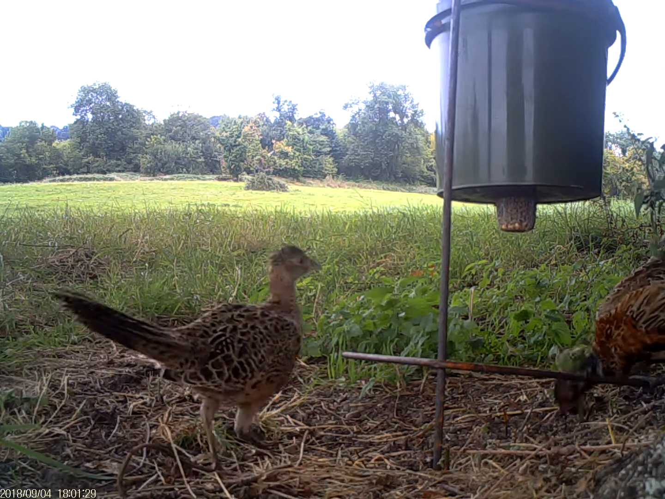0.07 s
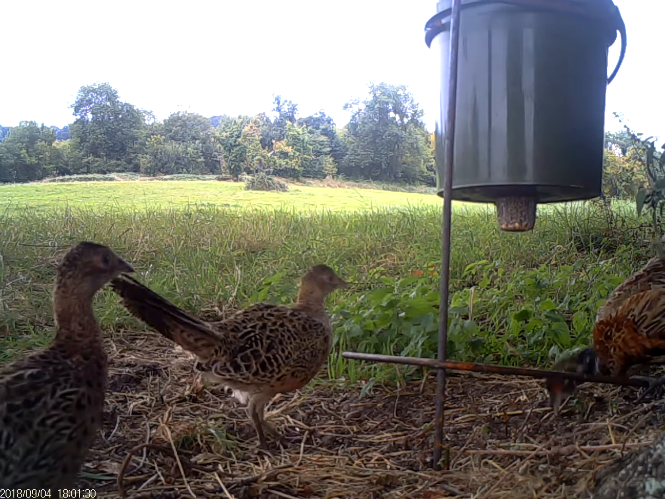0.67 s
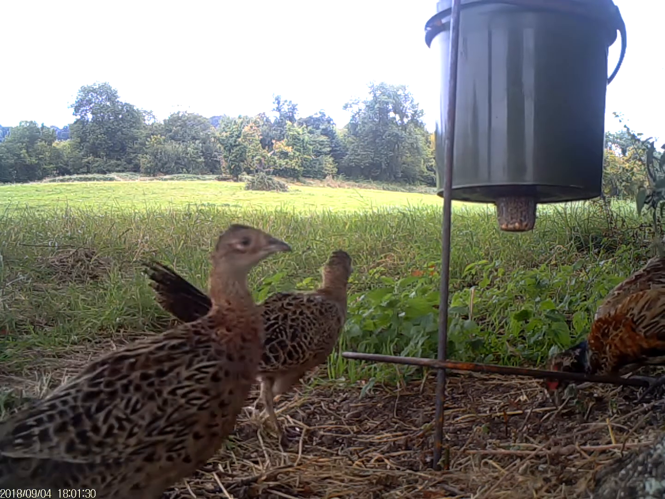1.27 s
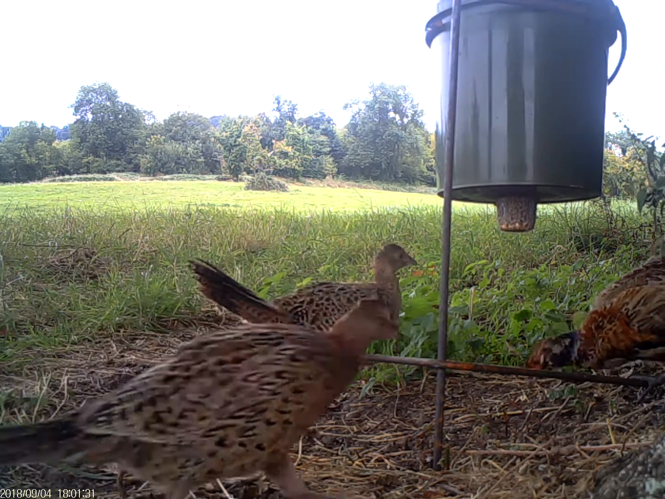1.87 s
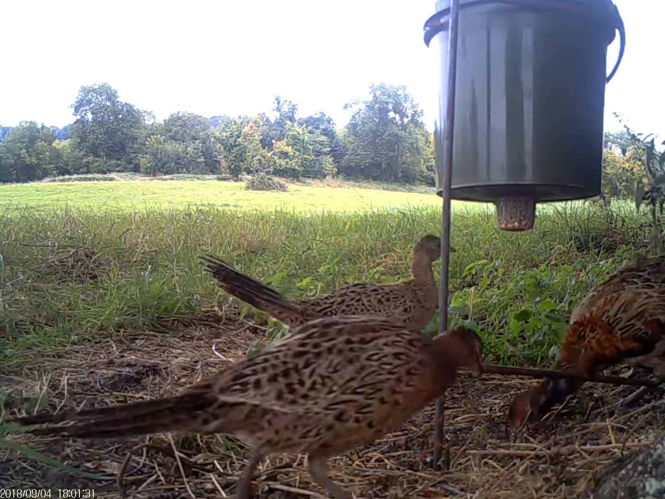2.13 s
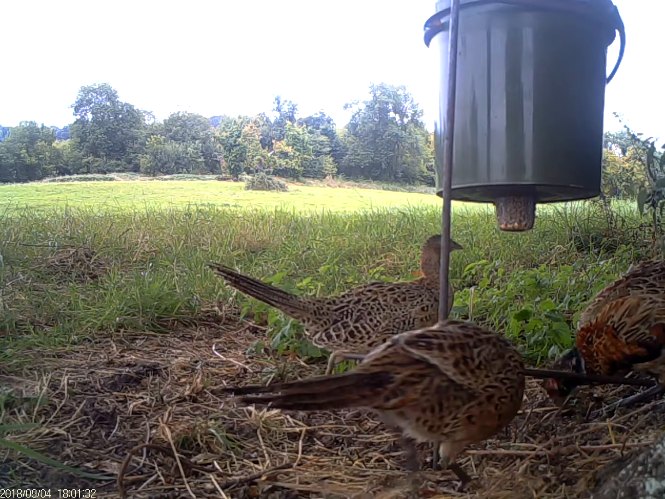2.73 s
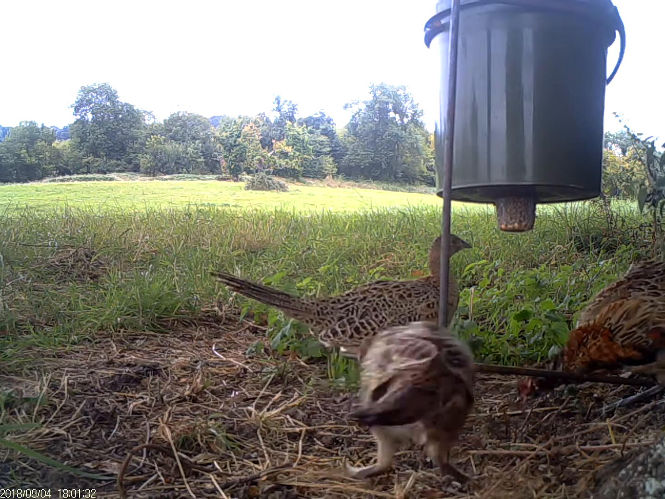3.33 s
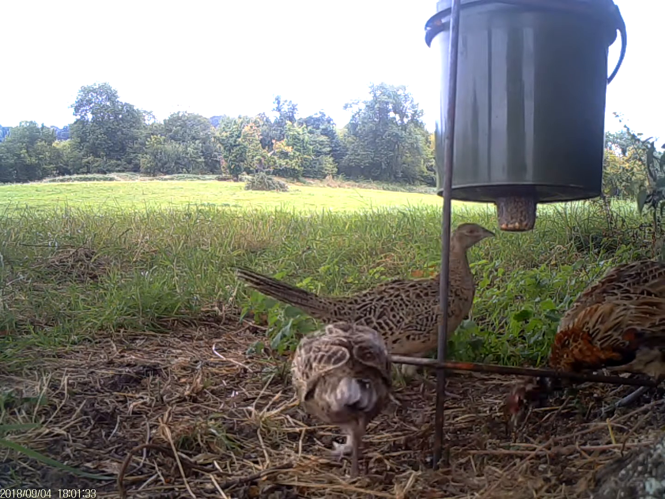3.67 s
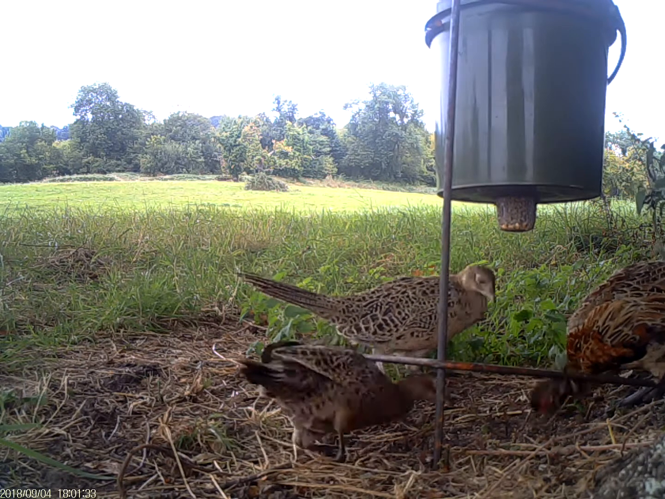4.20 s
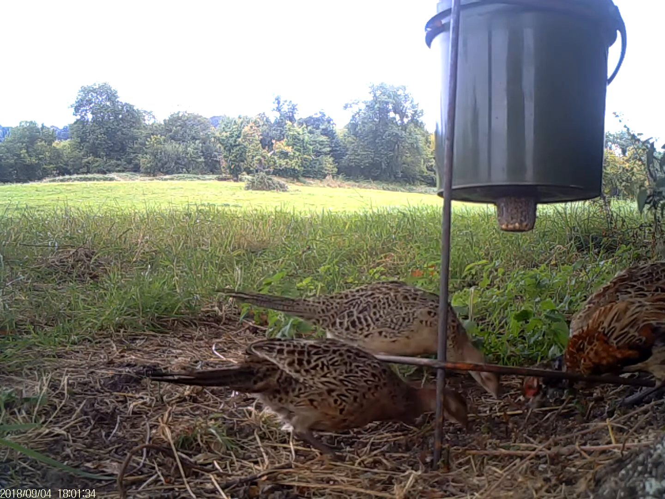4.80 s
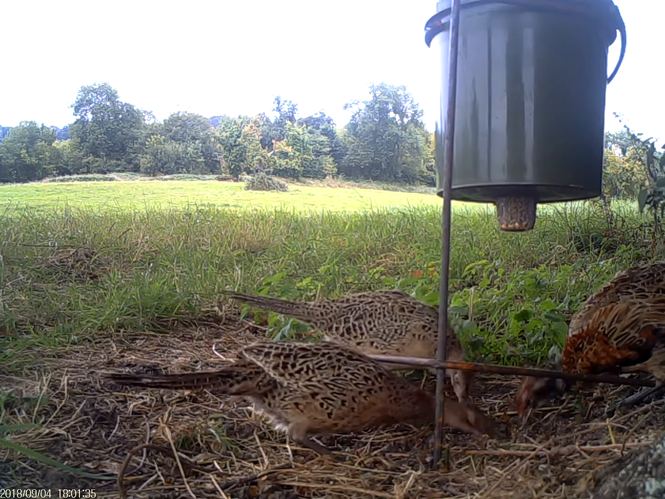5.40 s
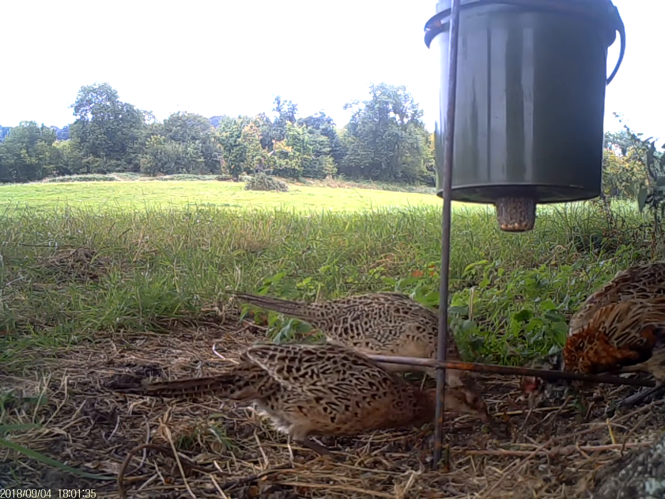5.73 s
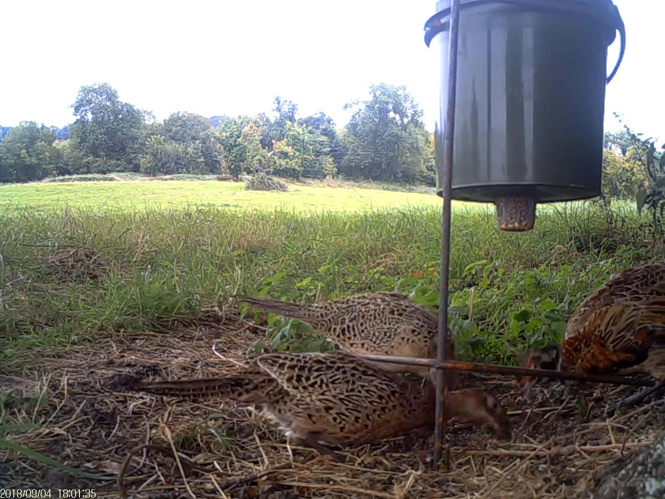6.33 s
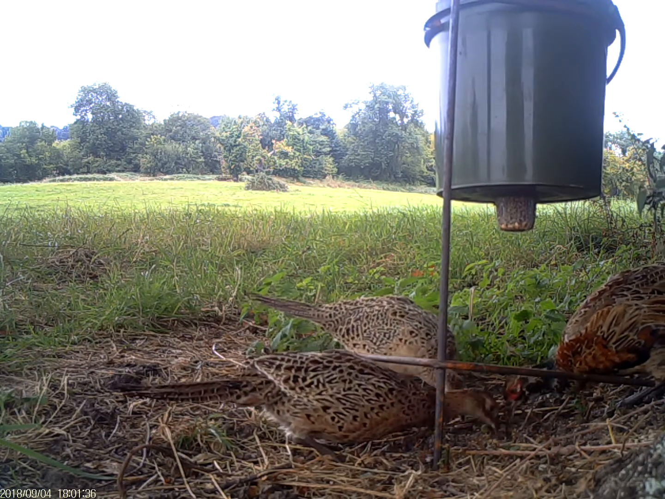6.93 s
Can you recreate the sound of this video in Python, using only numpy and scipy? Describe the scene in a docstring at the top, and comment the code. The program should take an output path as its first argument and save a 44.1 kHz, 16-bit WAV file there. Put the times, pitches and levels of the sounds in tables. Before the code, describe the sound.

A pheasant brushes through dry straw right by the microphone, a brief, crisp rustle with a few sharp, high snaps. Lighter steps and pecks follow as faint, scattered crackles and ticks, thinning out as the birds settle to feed. Light wind rumbles on the microphone in small gusts over the soft, steady hiss of an open field.

```python
"""Beside a field feeder, on dry straw, with a small trail camera close to the pheasants.
One bird brushes through the stalks right by the microphone. Lighter steps and pecks follow,
crackling as dry fibres slip and break, and single stalks snap with a short, high ring.
Light wind rumbles on the microphone over a steady, soft hiss."""
import sys
import numpy as np
from scipy import signal
from scipy.fft import rfft, irfft, next_fast_len
from scipy.io import wavfile
from scipy.ndimage import map_coordinates

SR = 44100
rng = np.random.default_rng(int(sys.argv[2]) if len(sys.argv) > 2 else 0)


def dump_mix(stems):
    """Bounce the given channels to the path in sys.argv[1] as a 16-bit WAV at rate SR."""
    frames = np.atleast_2d(stems).T  # one column per channel
    limited = np.clip(frames, -1, 1)  # hard clip at full scale
    pcm = np.round(limited * 32767).astype(np.int16)
    wavfile.write(sys.argv[1], SR, pcm)


N = 311787


def amp(db):
    """Decibels to gain."""
    return 10 ** (np.asarray(db) / 20)


def unit(x):
    """Scale to rms 1."""
    return x / np.sqrt(np.mean(x ** 2) + 1e-20)


def wobble(rate):
    """A smooth random curve, rate knots a second."""
    knots = rng.standard_normal(int(N * rate / SR) + 4)
    return map_coordinates(knots, [np.arange(N) * rate / SR])


def filtered(x, response):
    """x through a gain that depends on frequency."""
    size = next_fast_len(N + SR // 2)
    return irfft(rfft(x, size) * response(np.fft.rfftfreq(size, 1 / SR)), size)[:N]


def coloured(x, colour):
    """x shaped by (Hz, dB) points on a log axis, at rms 1."""
    hz, db = np.transpose(colour)
    return unit(filtered(x, lambda f: amp(np.interp(np.log(f + 1), np.log(hz), db))))


def hiss():
    """The even hiss of the open field and the microphone."""
    # The tone of the hiss. Each row: frequency in Hz, relative level in dB.
    hiss_colour = [(20, 6), (150, 1), (300, -3), (600, -6), (1200, -9), (2500, -13.5), (5000, -18),
                   (8000, -19.5), (12000, -20.5), (14500, -19.5), (15700, -27)]
    return amp(-52.5) * coloured(rng.standard_normal(N), hiss_colour)


def swells(gusts):
    """Each gust rises and dies as a bell curve; their powers add."""
    t = np.arange(N) / SR
    bells = [amp(db) * np.exp(-((t - peak) / width) ** 2) for peak, width, db in gusts]
    return np.linalg.norm(bells, axis=0)


def wind(breeze_db=-44.5):
    """Slow eddies buffet the microphone all along; the strongest gust sheds smaller, higher ones."""
    # Gusts on the microphone. Each row: peak time in seconds, half-width in seconds, level in dB.
    gusts = [(.2, 0.099, -37), (1.5, 0.35, -41.5), (2.27, 0.21, -33), (2.74, 0.1, -35.5), (3.35, 0.32, -41),
             (4.95, 0.44, -37.5), (5.43, 0.076, -34.5), (6.2, 0.1, -40)]
    # The brief flurry of small eddies, with the same columns.
    flurry = [(2.35, .08, -41.5)]
    # The rumble of the slow eddies. Each row: frequency in Hz, relative level in dB.
    rumble_colour = [(5, -8.5), (14, 1.5), (28, -2.5), (45, -13.5), (80, -21), (130, -29.5), (250, -58),
                     (600, -69)]
    flurry_colour = [(25, -11), (60, 8.0), (95, -1), (150, -26), (400, -48)]
    slow_eddies = coloured(rng.standard_normal(N), rumble_colour)
    fast_eddies = coloured(rng.standard_normal(N), flurry_colour)
    return np.hypot(swells(gusts), amp(breeze_db)) * slow_eddies + swells(flurry) * fast_eddies


def ticks(times, gains, ring_hz, t60_s):
    """A sum of tiny damped rings, one for each stalk or fibre."""
    t = np.arange(SR // 200) / SR
    decay = np.exp(-np.log(1000) * t / t60_s)
    rings = gains[:, None] * np.sin(2 * np.pi * ring_hz[:, None] * t) * decay
    samples = np.round(times * SR).astype(int)[:, None] + np.arange(len(t))
    return np.bincount(samples.ravel(), rings.ravel(), N)[:N]


def pressure(strokes, rise_s, fall_s, ease_db_per_s=0):
    """Each stroke (start, length, dB) loads the straw, may ease as it packs, then lets it settle."""
    t = np.arange(N) / SR
    shapes = []
    for start, length, db in strokes:
        age = t - start
        held = amp(db - ease_db_per_s * np.clip(age, 0, length))
        edges = np.exp(np.minimum(age, 0) / rise_s - np.maximum(age - length, 0) / fall_s)
        shapes.append(held * edges)
    return np.max(shapes, axis=0)


def crackle(colour, fibres_per_s, spread_db, clump_db, rub):
    """Dry fibres slip and break in clumps, over the fine noise of stalks rubbing; rms 1."""
    when, size, pitch = rng.random((int(fibres_per_s * N / SR), 3)).T
    gains = amp(spread_db * size ** 2)  # a few large fibres among many small ones
    fibres = ticks(when * N / SR, gains, ring_hz=4000 + 11000 * pitch, t60_s=0.0014)
    rubbing = rub * rng.standard_normal(N)
    clumps = amp(clump_db * wobble(110))
    return coloured((unit(fibres) + rubbing) * clumps, colour)


def steps(rest_db=-68.5, settle_db_per_s=1.7):
    """Feet and beaks near the camera stir thick stalks and fine chaff, which never quite come to rest."""
    # Steps and pecks. Each row: start in seconds, length in seconds, level in dB, chaff share 0-1.
    footwork = [(0.327, 0.018, -46, 0.45), (.36, 0.036, -49, .38), (.505, .04, -58.5, .37),
                (.61, 0.018, -54.5, 0.4), (.85, 0.46, -62, .42), (1.44, .11, -65, .35),
                (1.85, .11, -60, .43), (2.35, .13, -66.5, .2), (2.744, .026, -53, 0.5),
                (3.302, 0.021, -54.5, .37), (3.357, 0.075, -63, 0.9), (3.674, 0.045, -56.5, 0.44),
                (3.868, .045, -59, .4), (4.22, .11, -60, .33), (5.67, 0.066, -64, .92),
                (6.737, .09, -66, .43)]
    # Thick stalks answer lower than chaff. Each row: frequency in Hz, relative level in dB.
    stalk_colour = [(3000, -31), (5000, -15.5), (6400, -13), (7400, 0), (8200, 2.5), (9400, -6),
                    (11000, -11), (15600, -35)]
    # The brighter tone of fine chaff, with the same columns.
    chaff_colour = [(6000, -19.5), (9000, -10), (10000, -5.5), (11100, -2.5), (12200, -5), (13400, -20),
                    (15600, -21)]
    start, length, db, chaff = np.transpose(footwork)
    # The litter between steps calms as the birds stop to feed.
    rest = amp(rest_db - settle_db_per_s * np.arange(N) / SR)
    litter = np.zeros(N)
    for share, colour in [(1 - chaff, stalk_colour), (chaff, chaff_colour)]:
        strokes = list(zip(start, length, db + 10 * np.log10(share)))
        tread = pressure(strokes, rise_s=0.002, fall_s=0.0061, ease_db_per_s=8)
        # The straw around the foot stirs before and after a step.
        shuffle = amp(-11) * pressure(strokes, rise_s=0.027, fall_s=0.15)
        load = np.sqrt(tread ** 2 + shuffle ** 2 + rest ** 2)
        litter += load * crackle(colour, fibres_per_s=1500, spread_db=12.0, clump_db=3, rub=0.75)
    shifting_weight = amp(0.83 * wobble(70))
    return litter * shifting_weight


def snaps(t60_s=0.0028):
    """A stalk gives way with a sharp ring and a fainter overtone; it is too thin to radiate low notes."""
    # Single stalks. Each row: time in seconds, relative level in dB, ring frequency in Hz.
    stalks = [(0.0807, -21, 8180), (0.1133, -12, 8360), (0.1204, -19, 8130), (0.1774, -34, 8730),
              (0.3605, -29, 8090), (0.3733, -29, 8190), (0.398, -26.5, 7800), (0.4387, -37, 7990),
              (0.5102, -40, 8600), (0.612, -37, 8850), (0.6983, -33.5, 9330), (0.7662, -43, 11000),
              (1.4576, -41, 7260), (2.1869, -35, 8300), (2.7546, -38, 8060), (2.8255, -42, 8000),
              (3.5127, -39, 8650), (5.0845, -38, 8490), (6.2916, -44, 11000)]
    bend_s, db, ring_hz = np.transpose(stalks)
    break_s = bend_s + 0.0012  # a stalk bends for a moment before it gives
    rings = ticks(break_s, amp(db + 2), ring_hz, t60_s)
    overtones = ticks(break_s, amp(db - 2), np.minimum(1.4 * ring_hz, 13000), t60_s / 2)
    stalk_band = signal.butter(4, [6900, 14200], "bandpass", fs=SR, output="sos")
    return signal.sosfilt(stalk_band, rings - overtones)


def close_rustle():
    """A bird brushes through the stalks right by the microphone: dense and broad."""
    # A light brush with a hard push inside it. Each row: start in seconds, length in seconds, level in dB.
    strokes = [(0, 0.2, -48.5), (.082, 0.044, -35)]
    # Straw heard up close. Each row: frequency in Hz, relative level in dB.
    close_colour = [(1500, -39), (3000, -24), (4600, -16.5), (6200, -17), (7300, -10), (8400, -2),
                    (9600, -6.5), (10800, -11), (12200, -10.5), (14200, -15), (15600, -30)]
    load = pressure(strokes, rise_s=0.015, fall_s=0.016)
    return load * crackle(close_colour, fibres_per_s=3500, spread_db=1, clump_db=1.9, rub=0.57)


def scene():
    """Birds, wind and hiss at one microphone."""
    birds = close_rustle() + steps() + snaps()
    return (birds + wind() + hiss())[None]


def record(dry, top_hz=15780):
    """The trail camera keeps nothing above its band limit."""
    return np.array([filtered(channel, lambda hz: hz < top_hz) for channel in dry])


dry = scene()
out = record(dry)
dump_mix(out)
```